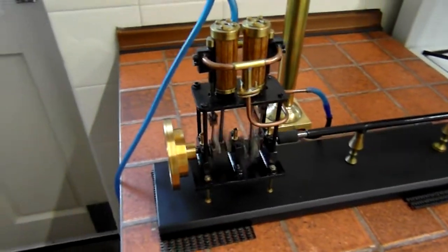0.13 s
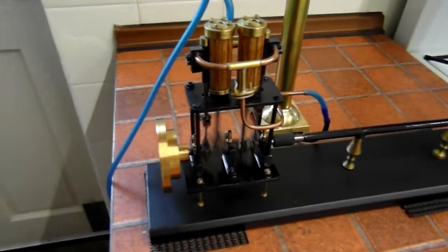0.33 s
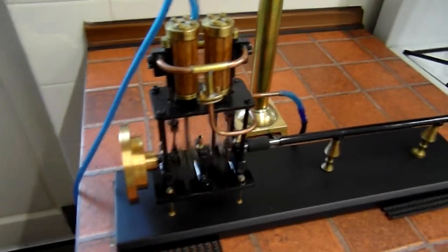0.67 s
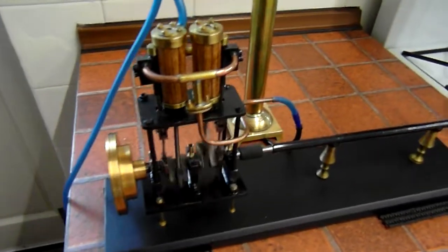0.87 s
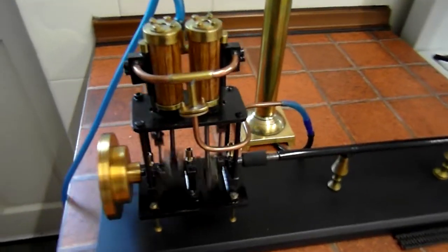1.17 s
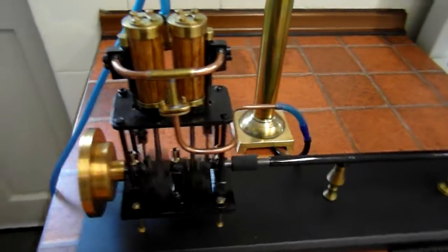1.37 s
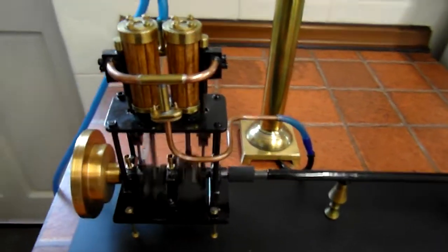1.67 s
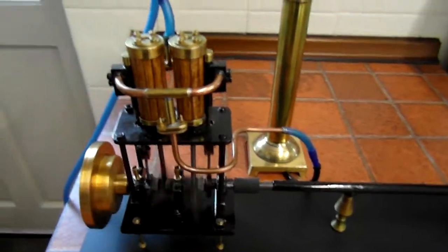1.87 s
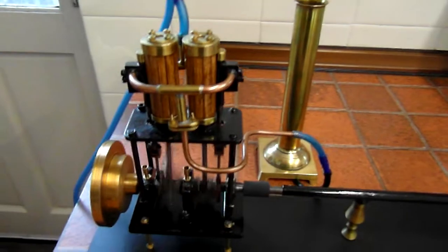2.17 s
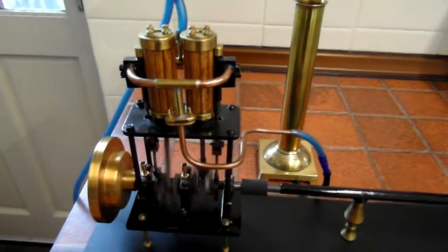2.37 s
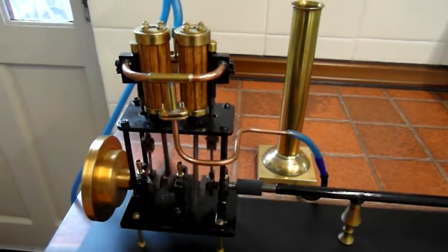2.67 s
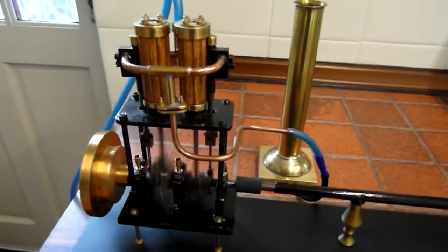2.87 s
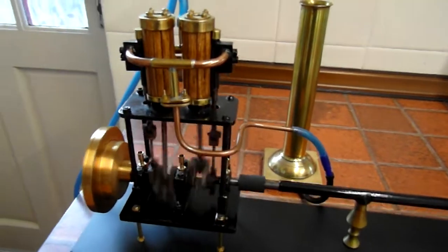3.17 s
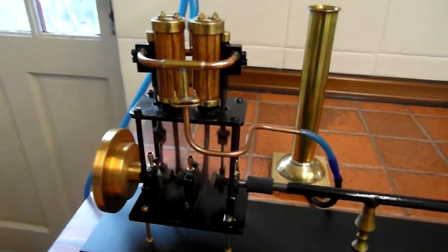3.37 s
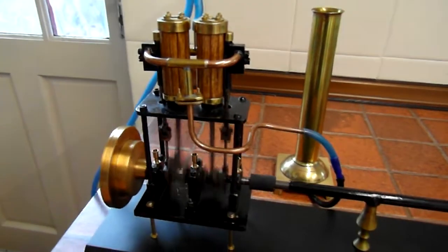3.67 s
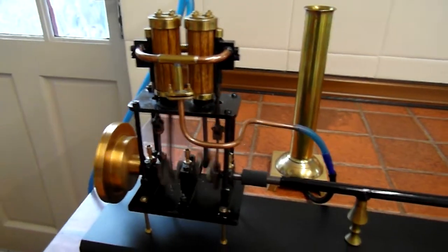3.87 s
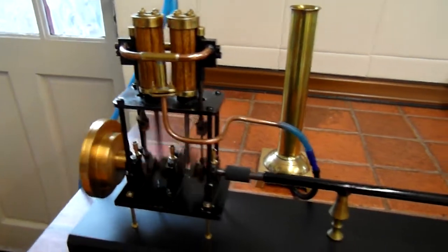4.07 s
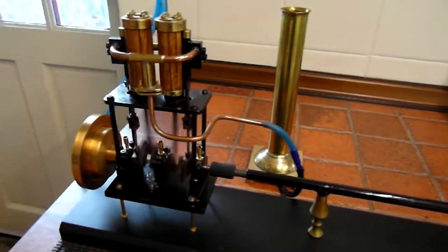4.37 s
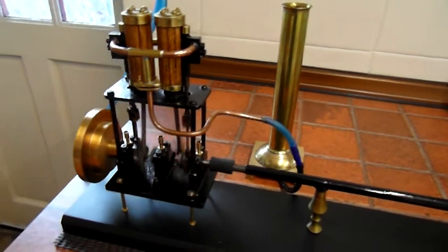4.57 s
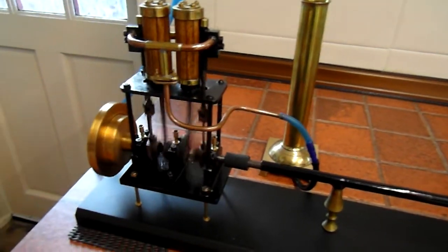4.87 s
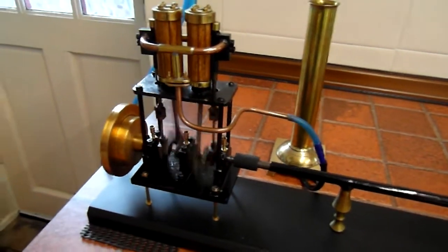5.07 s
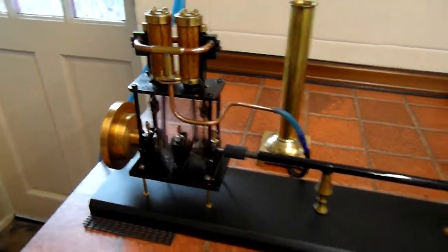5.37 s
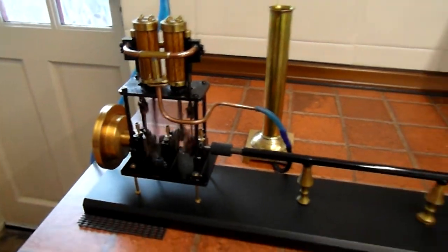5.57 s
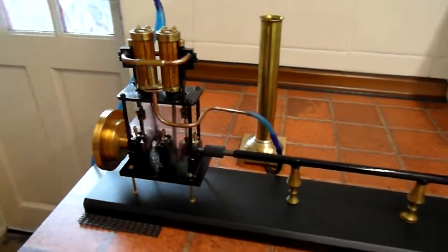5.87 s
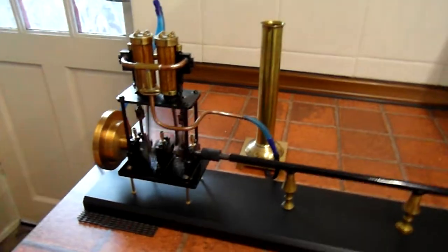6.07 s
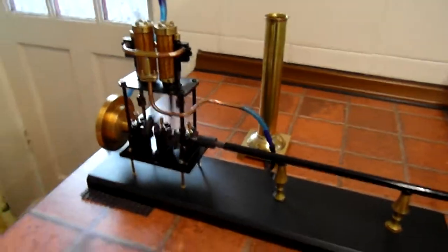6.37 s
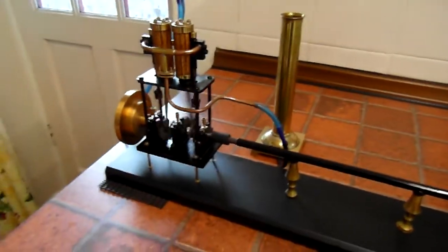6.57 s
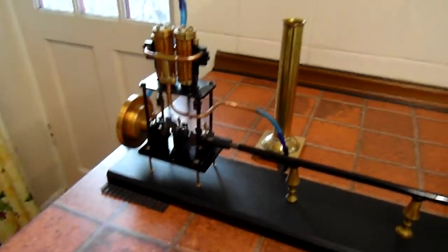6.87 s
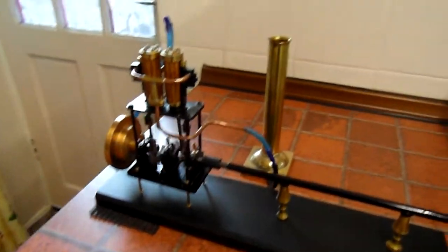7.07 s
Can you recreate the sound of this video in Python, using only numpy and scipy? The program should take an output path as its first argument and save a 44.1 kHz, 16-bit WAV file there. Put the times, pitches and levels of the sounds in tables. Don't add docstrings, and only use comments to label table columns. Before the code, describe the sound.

Rapid, even metal knocking and pulsing hiss from a little model engine in a tiled room, faltering near six seconds before squeaky air leaks begin.

```python
import sys
import numpy as np
from scipy import signal
from scipy.fft import rfft, irfft, next_fast_len
from scipy.io import wavfile
from scipy.ndimage import uniform_filter1d

SR = 44100
rng = np.random.default_rng(int(sys.argv[2]) if len(sys.argv) > 2 else 0)


def wrap_up_sound(samples):
    columns = np.atleast_2d(samples).T
    tamed = np.clip(columns, -1, 1)
    steps = np.round(tamed * 32767).astype(np.int16)
    wavfile.write(sys.argv[1], SR, steps)


def invert_db(level):
    return 10 ** (np.asarray(level, dtype=float) / 20)


N = 318402
T = np.arange(N) / SR

# time in seconds, load on the bearing in dB,
# air pressure in dB, how far the camera has stepped back from 0 to 1.
DRIVE = [(0, -13.5, -.5, 0.16), (.3, -14, -0.5, 0.3), (.6, -11.5, -0.5, 0), (1.3, -12, 0, 0),
         (2.9, -12, 0, 0.18), (4.3, -12.5, -0.5, 0.4), (5.0, -12.5, 0, 0.2), (5.7, -14, -0.5, 0.66),
         (5.99, -17, -1.5, 0.5), (6.2, -13, -2, 1), (6.6, -13.5, -1.5, 0.9), (6.8, -14, -0.7, 0.9),
         (7.22, -14, 0.06, 1)]


def evened(x):
    return x / np.sqrt(np.mean(x ** 2) + 1e-20)


def read(points, hz):
    f, value = np.transpose(points)
    return np.interp(np.log(hz + 1), np.log(f + 1), value)


def curves(rows, at):
    s, *columns = np.transpose(rows)
    return [np.interp(at, s, c) for c in columns]


def coloured(x, spectrum):
    size = next_fast_len(N)
    gain = invert_db(read(spectrum, np.fft.rfftfreq(size, 1 / SR)))
    return evened(irfft(rfft(x, size) * gain, size)[..., :N])


def resonate(x, hz, width):
    b, a = signal.iirpeak(hz, hz / width, SR)
    return signal.lfilter(np.convolve(b, b), np.convolve(a, a), x)


def clicks(s, size):
    at = np.round(np.ravel(s) * SR).astype(int)
    keep = (at >= 0) & (at < N)
    return np.bincount(at[keep], np.ravel(size)[keep], N)


def ports(x):
    # frequency in Hz, left-right likeness (1 is the same).
    likeness = [(60, 0.1), (170, 0.9), (500, 0.94), (1450, 0.98), (4190, 0.74), (12100, -1.5)]
    size = x.shape[1]
    same = np.clip(read(likeness, np.fft.rfftfreq(size, 1 / SR)), 0, 1)
    a, b = rfft(x)
    return irfft(np.array([a, same * a + np.sqrt(1 - same ** 2) * b]), size)


def crank():
    # time in seconds, turns made.
    turns_made = [(.0014, 0), (1.1519, 10), (2.3038, 20), (3.456, 30), (4.605, 40), (5.7504, 50),
                  (5.8689, 51), (5.99, 52), (6.1194, 53), (6.3802, 55), (6.7593, 58), (7.127, 61)]
    at, made = np.transpose(turns_made)
    s = np.interp(np.arange(made[-1] + 1), made, at)
    s = np.r_[2 * s[0] - s[1], s, 2 * s[-1] - s[-2]]
    return s, np.interp(T, s, np.arange(len(s)))


def rung(modes, s, size, spread_db, contact_s):
    t = T[:4000]
    out = np.zeros((2, N))
    chance = rng.standard_normal((np.size(s), len(modes), 2))
    for k, (hz, db, t60, pan_db) in enumerate(modes):
        decay = (-1) ** k * invert_db(db - 60 * t / t60)
        onset = 1 - np.exp(-t / contact_s)
        ring = decay * np.sin(2 * np.pi * hz * t) * onset
        for side in range(2):
            luck = chance[:, k, 0] + 0.12 * side * chance[:, k, 1]
            lands = invert_db(spread_db * luck - pan_db * side)
            out[side] += signal.oaconvolve(clicks(s, np.ravel(size) * lands), ring)[:N]
    return out


def bearing():
    # delay in ms, level in dB.
    bounces = [(0.2, 0.37), (2.5, 0.93), (3.8, -1), (4.9, -6), (5.9, -8), (7.0, -5), (8.1, -2), (10.2, -6),
               (11.6, -32)]
    # frequency in Hz, level in dB, time to fade by 60 dB in seconds, left-right difference in dB.
    frame_modes = [(2700, -5, .01, -2), (2950, -5, .008, 0), (3300, -6, .006, 0), (3850, -7, .005, 0),
                   (4500, -5, .014, 1), (5000, -3.5, .011, 1), (5850, -1, .012, 2), (6250, -1, .007, 0),
                   (6690, .2, .011, 2), (7400, -5, .005, 0), (8230, -4, .007, -1), (9200, -7, .007, -1),
                   (9980, -3.5, .007, -3), (11100, -4.5, .004, 2)]
    plate_modes = [(1660, -2, .04, -1), (1770, -1, .04, -1), (1900, 0, .04, -1), (2090, -5, .025, -1)]
    top_modes = [(460, 0, 0.031, 0), (506, -.5, .022, -0.5), (1220, -6, .021, -3)]
    bench_modes = [(209, 0, .16, -1)]
    tile_modes = [(568, 6, 0.042, -3)]
    # share of a turn, level in dB relative to the blow.
    linkage = [
        (.27, -23),
        (.37, -23),
        (.497, -12),
        (.51, -18),
        (.82, -20),
    ]

    s = crank()[0][1:-1, None]
    load_db, _, back = curves(DRIVE, s)
    chance = rng.standard_normal((len(s), 2, 1))
    blow_db = load_db + 0.08 * chance[:, 0]
    ring_db = load_db - 7 + 0.5 * back + 2.95 * chance[:, 1]
    delay_ms, bounce_db = np.transpose(bounces)
    late_ms = .1 * rng.standard_normal((len(s), len(bounces))) * np.sqrt(delay_ms)
    at = s + (delay_ms + late_ms) / 1000
    frame = rung(frame_modes, at, invert_db(blow_db + bounce_db - 2.0), spread_db=3.5, contact_s=0.0001)
    plate_db = ring_db + bounce_db - 0.17 * delay_ms - 5.0
    plate = rung(plate_modes, at + 0.00221, invert_db(plate_db), spread_db=1.5, contact_s=0.00013)

    top_size = invert_db(-26 + 1.5 * back) * np.array([1, .8])
    top = rung(top_modes, s + np.array([0, .0038]), top_size, spread_db=1.0, contact_s=.0006)
    bench = rung(bench_modes, s, invert_db(-38.5 - 13 * back), spread_db=1.2, contact_s=.002)
    tile = rung(tile_modes, s + 0.00192, invert_db(-37 + 5.5 * back), spread_db=2.0, contact_s=0.0027)

    share, tap_db = np.transpose(linkage)
    turn = np.diff(crank()[0])[1:, None]
    loose_db = 1.8 * rng.standard_normal((len(s), len(linkage)))
    tap_size = invert_db(blow_db + tap_db + loose_db)
    taps = rung(frame_modes, s + share * turn, tap_size, spread_db=2.0, contact_s=.0001)
    return frame + plate - top - bench + tile + taps


def pops():
    # time in seconds, left port in dB, right port in dB.
    hard = [(.0014, -22, -28), (.117, -24, -34), (.232, -23, -28), (.6915, -10.5, -50), (.922, -22, -21),
            (1.843, -26, -50), (2.765, -25, -25), (2.88, -20, -27), (3.456, -19, -21), (3.916, -11.5, -38),
            (4.26, -11.5, -20), (4.375, -21, -18.5), (4.605, -28, -21), (4.72, -29, -22),
            (4.834, -24, -19.5), (4.948, -20, -36), (5.063, -27, -20), (5.407, -25, -20), (5.52, -25, -21),
            (6.759, -42, -23)]
    s = crank()[0][1:-1]
    luck = np.clip(rng.standard_normal((len(s), 2)).T, -3, 1.3)
    usual_db = -32.5 - 10 * curves(DRIVE, s)[2] + 9.5 * luck
    hard_s, *hard_db = np.transpose(hard)
    usual = invert_db(usual_db) * (abs(s - hard_s[:, None]).min(0) > .02)
    size = np.c_[usual, invert_db(np.array(hard_db))] * invert_db(9.5)
    pulse = signal.windows.hann(28)
    at = np.r_[s, hard_s] + 0.003806
    return np.array([signal.oaconvolve(clicks(at, v), pulse)[:N] for v in size])


def valves():
    # share of a turn, then the change in dB in cylinder ports, inlet pipe, valve chest, open jet.
    edges = [(.04, -4, -6.5, -3.5, 2.2), (.23, -2, -9.5, -2, -1), (.33, 1, -4, -2, 0.4),
             (.51, -3.5, -7.5, -5, -1), (.62, -8.5, -0.8, 2.5, -0.5), (.72, 0, -4.5, 1.5, -2.5)]
    share, *depth_db = np.transpose(edges)
    away = (crank()[1] - share[:, None] + .5) % 1 - .5
    width_turns = 0.033
    return np.array(depth_db) @ np.exp(-.5 * (away / width_turns) ** 2)


def blown(drive, modes, waver_db):
    waver = invert_db(waver_db * evened(uniform_filter1d(rng.standard_normal((len(modes), N)), 700)))
    return evened(sum(invert_db(db) * resonate(drive * w, hz, width) for w, (hz, width, db) in zip(waver, modes)))


def air():
    # frequency in Hz, width in Hz, level in dB.
    port_modes = [(1037, 153, 1), (1219, 65, 9), (1331, 113, 10.5)]
    inlet_modes = [(1558, 170, 20.2), (1619.6, 52, 22.9), (1698, 150, 16.8)]
    chest_modes = [(2030, 75, -2), (2363, 116, -2), (2484, 196, 0.5), (2649, 129, 1), (2807, 54, -0.5)]
    # frequency in Hz, level in dB.
    jet_colour = [(180, -16.5), (900, -2.5), (2100, -16), (3100, 1.2), (4300, -1), (7000, -5.5),
                  (7600, -3.5), (11500, -11.5)]
    # level in dB, change in dB per dB of air pressure, change in dB when heard from further back.
    flows = [
        (-39.5, 4.5, 1.3),
        (-34.5, 0.65, 0),
        (-31, 1.75, -1.5),
        (-31.5, 1.5, 1.3),
    ]

    _, pressure_db, back = curves(DRIVE, T)
    out = np.zeros((2, N))
    cavities = (port_modes, inlet_modes, chest_modes, None)
    for valve_db, (db, follows, back_db), modes in zip(valves(), flows, cavities):
        flutter_db = (1.5 if modes else .8) * evened(uniform_filter1d(rng.standard_normal(N), 300))
        drift_db = 0.75 * evened(uniform_filter1d(rng.standard_normal(N), round(.3 * SR)))
        drive = ports(rng.standard_normal((2, N)))
        if modes:
            sound = blown(drive * invert_db(1.5 * valve_db + flutter_db), modes, waver_db=.8)
        else:
            sound = evened(coloured(drive, jet_colour) * invert_db(1.8 * valve_db + flutter_db))
        out += invert_db(db + 2.5 + follows * pressure_db + back_db * back + drift_db) * sound
    return out


def exhaust():
    # frequency in Hz, level in dB.
    hose = [(132, 0), (262, -13), (395, -18.5), (525, -8.5)]
    # share of a turn at opening, length in turns, level in dB.
    puffs = [
        (0.358, 0.33, -34.5),
        (0.837, 0.54, -44),
    ]
    s, angle = crank()
    out = np.zeros(N)
    for share, length, db in puffs:
        since = (angle - share) % 1
        seconds = since / np.gradient(angle) / SR
        swing = sum(invert_db(d) * np.cos(2 * np.pi * hz * (seconds - .0075)) for hz, d in hose)
        out += invert_db(db) * swing * np.sin(np.pi * np.minimum(since / length, 1)) ** .6
    return out * invert_db(2.9 * curves(DRIVE, T)[1])


def compressor():
    # frequency in Hz, level in dB.
    casing = [(370, -70), (390, -56), (600, -58), (660, -62), (710, -54), (795, -53), (830, -60),
              (1220, -57)]
    rumble_colour = [(20, -14), (45, -8), (80, -12), (130, 23), (300, 22), (500, 19.5), (700, 18.5),
                     (1200, 3.5)]
    # time in seconds, rumble in dB, drone in dB.
    levels = [(0, -44, 0.5), (3, -43.5, -0.5), (3.5, -43.5, 1), (5.7, -43.5, -2), (6, -53, 1.5),
              (6.5, -42.5, -3), (7.22, -49, -6.5)]
    piston_hz = 24.266
    hz = piston_hz * np.arange(15, 51)
    chance = rng.random((len(hz), 3))
    drift_hz = .05 + .15 * chance[:, :1]
    drift_db = 5 * np.sin(2 * np.pi * (drift_hz * T + chance[:, 1:2]))
    tones = np.sin(2 * np.pi * (hz[:, None] * T + chance[:, 2:]))
    drone = (invert_db(read(casing, hz)[:, None] + drift_db) * tones).sum(0)
    rumble = coloured(ports(rng.standard_normal((2, N))), rumble_colour)
    rumble_db, drone_db = curves(levels, T)
    return invert_db(drone_db + 2.5) * drone + invert_db(rumble_db) * rumble


def room(x):
    # frequency in Hz, time to fade by 60 dB in seconds.
    fading = [(300, 0.35), (2000, 0.46), (5000, 0.22), (10000, 0.2)]
    out = np.zeros((2, N))
    angle = crank()[1] + .3
    for k in range(3):
        hz, t, z = signal.stft(ports(rng.standard_normal((2, 16384))), SR, nperseg=256)
        tail = signal.istft(z * invert_db(-60 * t / read(fading, hz)[:, None]), SR, nperseg=256)[1]
        tail = np.pad(tail, ((0, 0), (150, 0))) / np.linalg.norm(tail[0])
        turns = x * (angle.astype(int) % 3 == k)
        out += signal.oaconvolve(turns[None], tail, axes=1)[:, :N]
    return out


def grip():
    # time in seconds, level in dB.
    handling = [
        (0, -54),
        (3, -51),
        (3.3, -58),
        (7.22, -78),
    ]
    # frequency in Hz, level in dB.
    tremor = [(15, -11), (45, 21), (70, -17), (120, -46)]
    return invert_db(curves(handling, T)[0]) * coloured(ports(rng.standard_normal((2, N))), tremor)


def slides():
    # share of a turn, level in dB.
    pings = [
        (.41, -16.5),
        (.59, -16.5),
        (.78, -12),
    ]
    # frequency in Hz, level in dB, time to fade by 60 dB in seconds, left-right difference in dB.
    lid = [(2420, -0.5, .013, -2.5), (2667, -2.6, 0.016, 1.2)]
    s = crank()[0][:-1, None]
    share, ping_db = np.transpose(pings)
    chance = rng.standard_normal((len(s), len(pings), 2))
    at = s + share * np.diff(crank()[0])[:, None] + 0.0024 * chance[..., 0]
    back_db = -3.2 * curves(DRIVE, at)[2]
    return rung(lid, at, invert_db(ping_db + back_db + 3.5 * chance[..., 1]), spread_db=1.0, contact_s=0.0016)


def gland():
    # start in seconds, length in seconds, whistle in dB, rasp in dB.
    leaks = [(6.467, 0.035, -49, -35), (6.61, 0.024, -40, -31), (6.705, 0.029, -21.5, -45),
             (6.735, 0.053, -21, -25.5), (6.815, 0.034, -27, -47), (6.852, 0.063, -27, -29.5),
             (6.923, 0.1, -28.5, -44), (6.98, 0.067, -39, -29), (7.099, 0.06, -26, -28),
             (7.18, .04, -28, -41)]
    # frequency in Hz, width in Hz, level in dB.
    whistle_modes = [(1585, 40, 0)]
    rasp_modes = [(976, 73, -1.5), (1100, 19, 12), (1240, 47, 6.5), (1420, 34, 10), (2163, 45, 10.5)]
    swell = np.zeros((2, N))
    for s, length, *db in leaks:
        swell += invert_db(db)[:, None] * np.sin(np.pi * np.clip((T - s) / length, 0, 1)) ** 0.82
    swell[0] += invert_db(-44) * curves(DRIVE, T)[2] ** 2
    whistle = blown(ports(rng.standard_normal((2, N))), whistle_modes, waver_db=2.0)
    rasp = blown(ports(rng.standard_normal((2, N))), rasp_modes, waver_db=2.0)
    return swell[0] * whistle + swell[1] * rasp


def scene():
    metal = bearing() + slides()
    near = metal + exhaust() + air() + gland()
    left_late_s, left_db = 2.7e-5, -0.57
    late = np.exp(-2j * np.pi * np.fft.rfftfreq(N, 1 / SR) * left_late_s)
    near = np.array([irfft(rfft(near[0]) * late, N), near[1]])
    far = invert_db(-7.5) * room(metal.mean(0)) + compressor()
    return (near + far) * invert_db(np.array([[.5], [-.5]]) * left_db) + grip()


def top_cut(x):
    return signal.sosfilt(signal.butter(12, 11490, fs=SR, output="sos"), x)


def record(dry):
    bass_cut = signal.butter(1, 60, "high", fs=SR, output="sos")
    treble_limit = signal.cheby2(11, 33, 12250, fs=SR, output="sos")
    heard = signal.sosfilt(np.vstack([bass_cut, treble_limit]), dry - pops())
    mix = np.clip(heard, -1, 1)
    return top_cut(mix)


dry = scene()
out = record(dry)
wrap_up_sound(out)
```